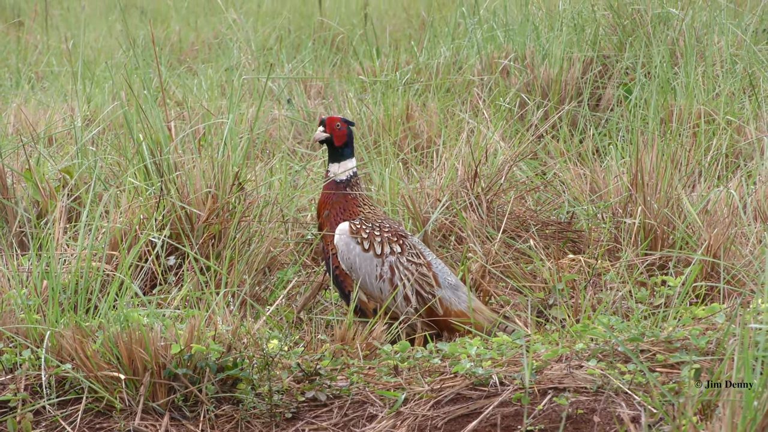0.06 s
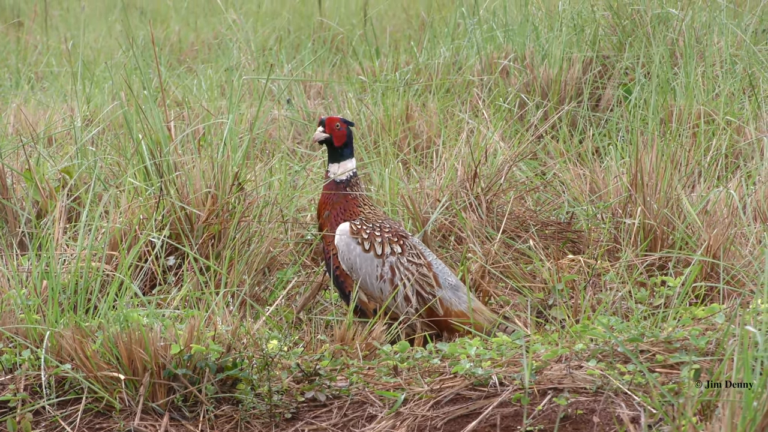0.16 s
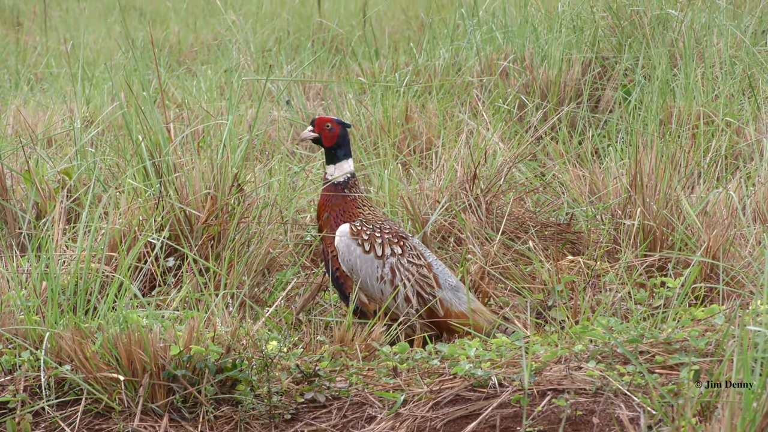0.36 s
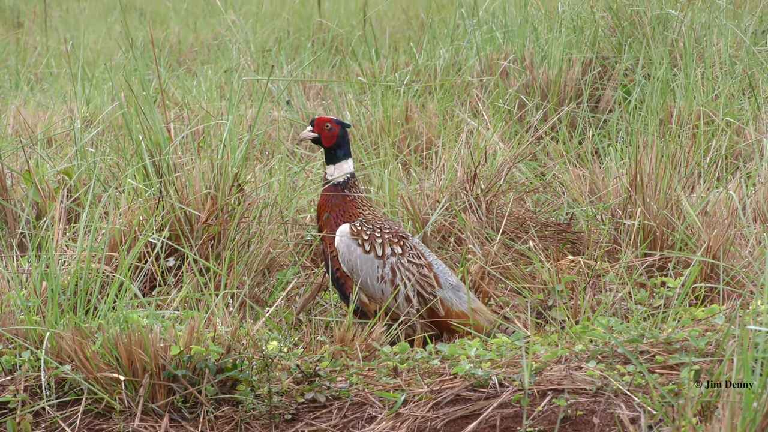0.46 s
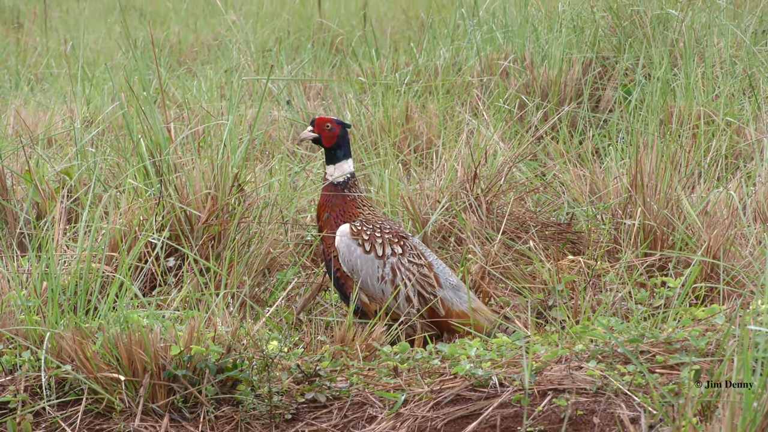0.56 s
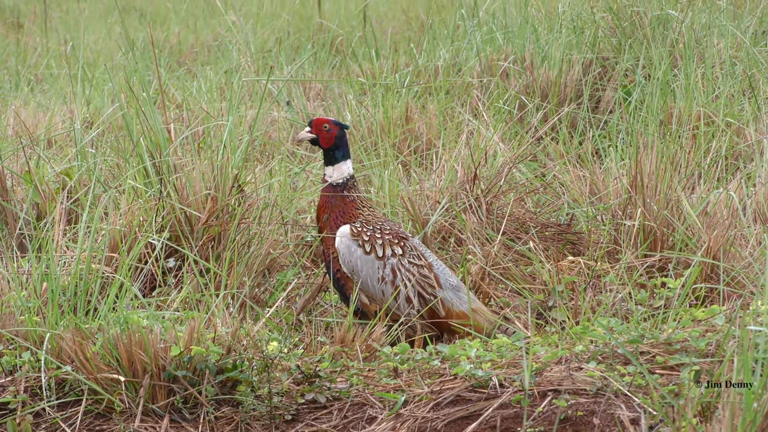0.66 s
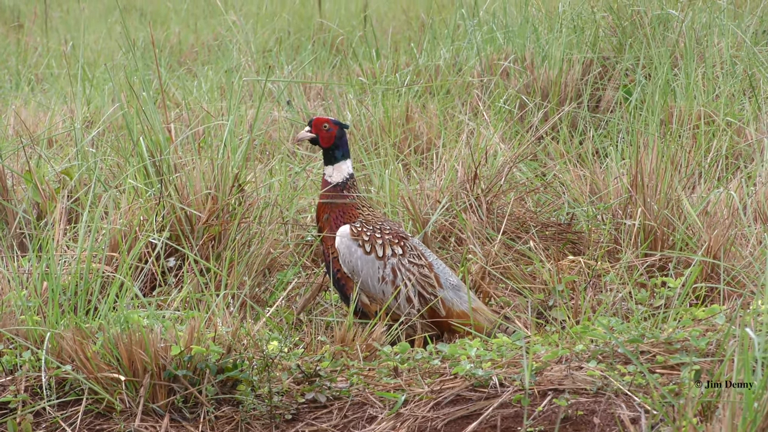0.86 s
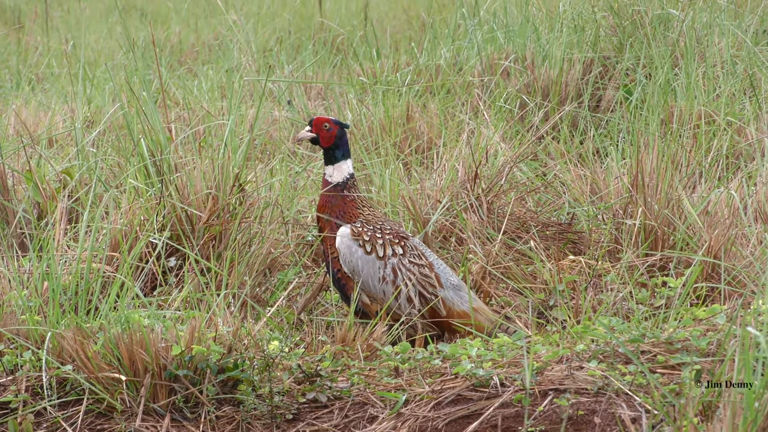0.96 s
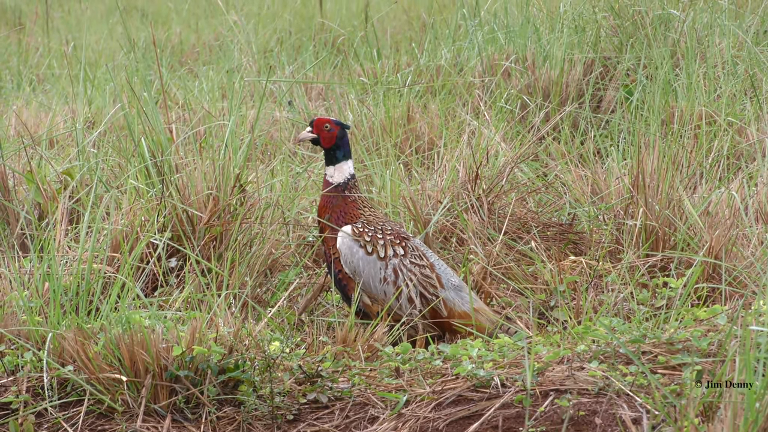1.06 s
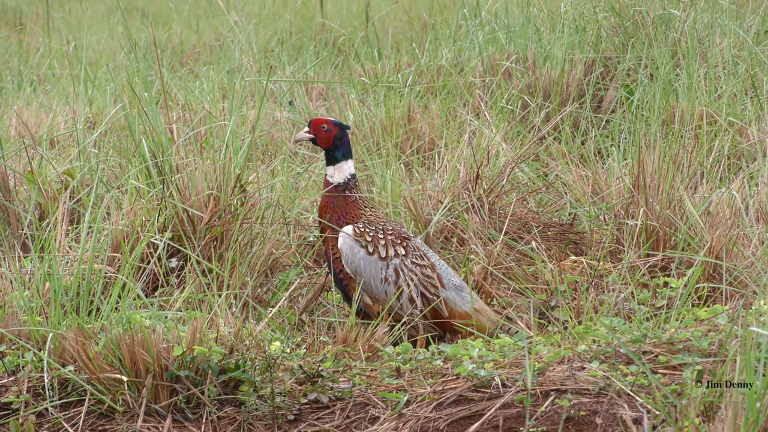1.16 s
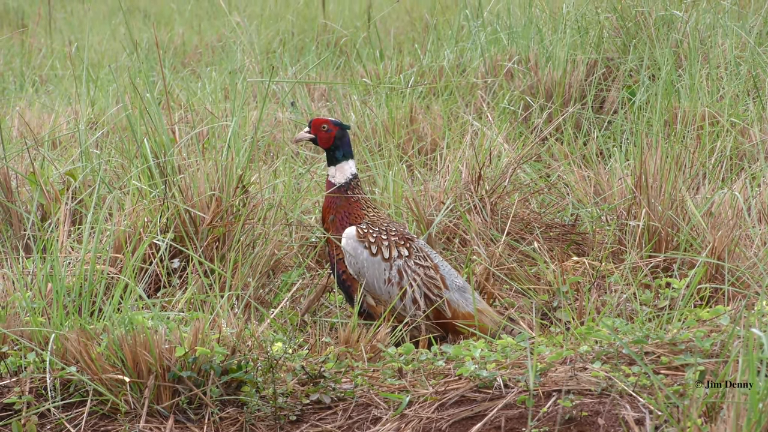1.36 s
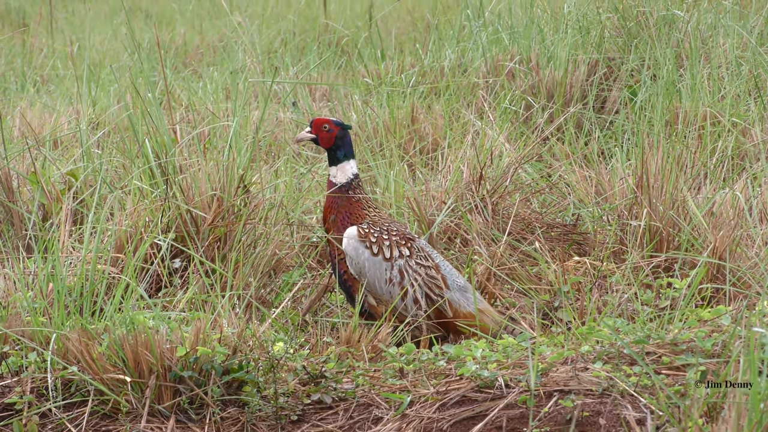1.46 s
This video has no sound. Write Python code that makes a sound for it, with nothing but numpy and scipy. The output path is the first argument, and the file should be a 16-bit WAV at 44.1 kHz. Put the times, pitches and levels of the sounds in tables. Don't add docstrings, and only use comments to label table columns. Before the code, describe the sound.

A pheasant close by lets out a long harsh crow, then a shorter one, followed by a quick run of low wing thuds. Open grassland, slight echo, faint hiss and distant songbirds, close stereo pickup.

```python
import sys
import numpy as np
from scipy import signal
from scipy.fft import rfft, irfft
from scipy.io import wavfile
from scipy.ndimage import uniform_filter1d

SR = 44100
rng = np.random.default_rng(int(sys.argv[2]) if len(sys.argv) > 2 else 0)


def natural_amplitude(level_db):
    exponent = np.asarray(level_db, float) / 20
    return 10 ** exponent


def bounce(signal):
    frames = np.transpose(np.atleast_2d(signal))
    limited = np.clip(frames, -1, 1)
    pcm = np.round(limited * 32767).astype(np.int16)
    wavfile.write(sys.argv[1], SR, pcm)


N = 66150


def evened(x):
    return x / np.sqrt(np.mean(x ** 2) + 1e-20)


def read(points, hz):
    f, value = np.transpose(points)
    return np.interp(np.log(hz + 1), np.log(f + 1), value)


def add(mix, start_s, sound):
    part = mix[..., max(round(start_s * SR), 0):][..., :sound.shape[-1]]
    part += sound[..., :part.shape[-1]]


def resonate(x, hz, width_hz):
    turn = np.exp(2j * np.pi * np.cumsum(hz * np.ones(len(x))) / SR)
    decay = np.exp(-np.pi * width_hz / SR)
    return 2 * (turn * signal.lfilter([1 - decay], [1, -decay], x / turn + 1e-18)).real


def drift(n, seconds):
    width = max(int(seconds * SR), 2)
    noise = rng.standard_normal(n)
    return evened(uniform_filter1d(uniform_filter1d(noise, width), width))


# frequency in Hz, level in dB per Hz.
AIR_SPECTRUM = [(12, -43), (20, -12.5), (123, -16), (192, -8.5), (277, -13.5), (498, -10.5), (1480, -15.5),
                (1960, -27.5), (15900, -40)]
# frequency in Hz, left-right likeness from -1 to 1.
COHERENCE = [(60, 0.95), (180, 0.96), (550, 0.89), (1650, -0.37), (4970, -0.0096), (15000, -0.53)]


def air():
    level_db, patch_db = -43.5, 1.73
    frames, hz = N // 256 + 5, np.fft.rfftfreq(1024, 1 / SR)
    a, b, c, d, patches = rng.standard_normal((frames, 513, 5)).T
    patches = evened(uniform_filter1d(uniform_filter1d(patches, 10, 0), 12, 1))
    same = np.clip(read(COHERENCE, hz), -1, 1)[:, None]
    left = a + 1j * b
    right = same * left + np.sqrt(1 - same ** 2) * (c + 1j * d)
    z = np.array([left, right]) * natural_amplitude(read(AIR_SPECTRUM, hz)[:, None] + patch_db * patches)
    noise = signal.istft(z, nperseg=1024, noverlap=768)[1][:, :N]
    return natural_amplitude(level_db) * evened(noise)


# start in seconds, length in seconds, first and last pitch in Hz, level in dB.
SONG_NOTES = [
    (.175, .028, 4900, 5000, -63),
    (1.115, .028, 3400, 3150, -54.5),
    (1.15, .028, 3350, 3200, -56),
    (1.2, .05, 3100, 3100, -61),
    (1.328, .045, 4450, 4060, -54),
    (1.368, .018, 4200, 4350, -58),
    (1.4, .045, 3950, 3430, -57),
    (1.475, .02, 3550, 3500, -60),
]


def songbirds():
    out = np.zeros(N)
    for start, length, from_hz, to_hz, db in SONG_NOTES:
        u = np.arange(0, 1, 1 / (length * SR))
        hz = to_hz + (from_hz - to_hz) * (1 - u) ** 1.79
        tone = np.sin(2 * np.pi * np.cumsum(hz) / SR)
        add(out, start, natural_amplitude(db + 3) * np.sin(np.pi * u) ** .6 * tone)
    out = out * natural_amplitude(1.6 * drift(N, .004))
    blur = rng.standard_normal((2, 4000)) * np.exp(-np.arange(4000) / SR / .015)
    wet = signal.fftconvolve(out[None], blur / np.linalg.norm(blur[0]), axes=1)[:, :N]
    return out * natural_amplitude([[-1.5], [1.5]]) + wet * .6


# delay in seconds, level in dB, smear in seconds, left-right balance in dB.
ECHOES = [
    (0.042, -18.5, 0.039, 8),
    (.128, -23.5, .02, -1.5),
    (0.291, -36.5, .03, 10),
]
# frequency in Hz, decay time over 60 dB in seconds.
FIELD_DECAY = [(500, 1), (1100, 0.64), (2000, 0.83), (4000, 0.75), (7000, 0.55), (12000, 0.23)]
# frequency in Hz, level in dB.
ECHO_COLOUR = [(1100, -1.5), (1950, -4.5), (3000, 2.5), (3850, -5.5), (4100, 7), (5000, 0), (11500, 7.5),
               (12500, -16)]


def meadow(x):
    tail_db = -13.5
    t = np.arange(SR) / SR
    hz, frame_s, z = signal.stft(rng.standard_normal((2, SR)), SR, nperseg=256)
    z = z * natural_amplitude(-60 * frame_s / read(FIELD_DECAY, hz)[:, None])
    tail = signal.istft(z, SR, nperseg=256)[1][:, :SR]
    tail = tail * np.clip(t / 0.019, 0, 1)
    room = natural_amplitude(tail_db) * tail / np.linalg.norm(tail[0])
    for delay, db, smear, pan_db in ECHOES:
        shape = np.exp(-np.maximum(t - delay, 0) / smear) * (t >= delay)
        noise = rng.standard_normal((3, SR))
        clump = shape * (noise[:1] + 0.23 * noise[1:])
        balance = natural_amplitude(db + pan_db * np.array([[.5], [-.5]]))
        room = room + balance * clump / np.linalg.norm(clump[0])
    far = irfft(rfft(x) * natural_amplitude(read(ECHO_COLOUR, np.fft.rfftfreq(N, 1 / SR))), N)
    return signal.fftconvolve(far[None], room, axes=1)[:, :N]


# frequency in Hz, left minus right in dB.
PAN = [(60, .3), (250, .8), (600, .5), (1100, -1), (2000, 1.2), (4000, .8), (8000, 0)]
# frequency in Hz, radians by which left leads.
LEAD = [(300, 0), (1200, -.15), (2500, -.4), (4100, -1.1), (5500, -1.2), (8000, -1.2)]


def ports(x):
    top_hz, top_db = 12100, -18
    grass_hz, grass_s, grass_share = 6300, .012, .75
    hz = np.fft.rfftfreq(N, 1 / SR)
    half = natural_amplitude(read(PAN, hz) / 2) * np.exp(.5j * read(LEAD, hz))
    stems = rng.standard_normal((2, 2000)) * np.exp(-np.arange(2000) / SR / grass_s)
    scattered = rfft(stems / np.linalg.norm(stems[0]), N)
    share = grass_share / (1 + (grass_hz / (hz + 1)) ** 8)
    paths = np.sqrt(1 - share) * np.array([half, 1 / half]) + np.sqrt(share) * scattered
    return irfft(rfft(x) * natural_amplitude(top_db * (hz > top_hz)) * paths, N)


# time in seconds, frequency in Hz, level in dB.
CLUCKS = [
    (0.216, 1700, -71),
    (0.724, 2750, -52),
    (0.73, 5500, -42.5),
]
# time in seconds, level in dB.
TICKS = [
    (.993, -48),
    (1.112, -50),
    (1.14, -51),
    (1.195, -50),
]


def clicks():
    out, t = np.zeros(N), np.arange(600) / SR
    for s, hz, db in CLUCKS:
        envelope = (t / 0.0032) * np.exp(-t / 0.0069)
        add(out, s - .003, natural_amplitude(db + 5.5) * envelope * np.sin(2 * np.pi * hz * t))
    for s, db in TICKS:
        noise = evened(resonate(rng.standard_normal(600), 2200, 3500))
        add(out, s, natural_amplitude(db) * noise * np.exp(-t / .002))
    return out


# time in seconds, thump level in dB, swish level in dB.
WINGBEATS = [
    (.94, -49, -43),
    (1.018, -36, -56),
    (1.094, -34.5, -48),
    (1.171, -30.5, -43),
    (1.248, -29, -45),
    (1.325, -30, -40),
    (1.394, -29.5, -46),
    (1.467, -30, -73),
]


def wings():
    thump_hz, thump_s, swish_hz, swish_s = 95, .0041, 1500, .006
    up_lead_s, up_db = .024, -9
    whirr_hz, whirr_db, whirr_start_s, whirr_rise_s = 350, -46.5, 0.83, 0.14
    out, t = np.zeros(N), np.arange(-2000, 2000) / SR
    push = np.cos(2 * np.pi * thump_hz * t) * np.exp(-.5 * (t / thump_s) ** 2)
    for s, db, swish_db in WINGBEATS:
        hiss = evened(resonate(rng.standard_normal(len(t)), swish_hz, 3000))
        flap = natural_amplitude(db) * push + natural_amplitude(swish_db) * hiss * np.exp(-abs(t) / swish_s)
        add(out, s + t[0], flap)
        add(out, s + t[0] - up_lead_s, natural_amplitude(up_db) * flap[::-1])
    whirr = evened(resonate(rng.standard_normal(N), whirr_hz, 900)) * natural_amplitude(1.2 * drift(N, .012))
    rise = np.clip((np.arange(N) / SR - whirr_start_s) / whirr_rise_s, 0, 1)
    return out + natural_amplitude(whirr_db) * whirr * rise


# frequency in Hz, width in Hz, level in dB.
THROAT = [(782, 510, -17), (1267, 230, -10), (1653, 134, -15), (1915, 152, -8), (3007, 810, -14.5),
          (3530, 210, -10.5), (3830, 131, -.5), (4025, 185, -3), (4720, 600, -10), (5159, 440, -10.5),
          (5890, 640, -19), (8100, 4170, -20.5), (9680, 6600, -23)]


def throat(drive, bright_db):
    beak_hz = 4400
    plain, coloured = 0, 0
    for k, (hz, width, db) in enumerate(THROAT):
        ring = resonate(resonate(drive, hz, width), hz, width) / np.sqrt(width)
        ring = (-1) ** k * natural_amplitude(db) * ring
        plain = plain + ring
        coloured = coloured + ring * natural_amplitude(bright_db * (hz > beak_hz))
    return coloured / np.std(plain)


def rattle(hz, bright_db):
    divide, jitter, breath = 5, .03, .62
    n = len(hz)
    turns = np.cumsum(hz / divide * (1 + jitter * drift(n, 0.00589))) / SR
    pulses = sum(np.cos(2 * np.pi * k * turns) for k in range(3, 56))
    puffs = (.4 + np.exp(-(turns % 1) / .4)) * rng.standard_normal(n)
    return throat((1 - breath) * evened(pulses) + breath * evened(puffs), bright_db)


def whistle(hz, rough):
    width_hz, wobble_db = 70, 4
    n = len(hz)
    wavering_hz = hz * (1 + 0.058 * rough * drift(n, 0.0012))
    clean = np.sqrt(2) * np.sin(2 * np.pi * np.cumsum(wavering_hz) / SR)
    clean = clean * natural_amplitude(wobble_db * rough * drift(n, 0.0032))
    fuzz = evened(resonate(resonate(rng.standard_normal(n), hz, 3 * width_hz), hz, width_hz))
    return np.sqrt(1 - rough ** 2) * clean + rough * fuzz


def syllable(rows):
    s, hz, tone_db, rasp_db, bright_db = np.transpose(rows)
    t = np.arange(round(.35 * SR)) / SR + s[0]
    hz, bright_db = np.interp(t, s, hz), np.interp(t, s, bright_db)
    rough = .22 * np.clip(natural_amplitude(np.interp(t, s, rasp_db - tone_db) + 3), 0, 1.3)
    ends = np.clip(np.minimum(t - s[0], s[-1] - t) / 0.0016, 0, 1)
    tone = natural_amplitude(np.interp(t, s, tone_db)) * whistle(hz, rough)
    rasp = natural_amplitude(np.interp(t, s, rasp_db)) * rattle(hz, bright_db)
    return s[0], ends * (tone + rasp)


# time in seconds, whistle in Hz, whistle level in dB, rasp level in dB,
# beak brightness in dB.
CROW_SYLLABLES = [
    [(0.212, 1043, -66, -53, -5), (0.22, 1034, -34.5, -38, 2), (0.23, 1027, -22, -22.5, -4),
     (0.28, 1071, -21, -19.5, 0.5), (0.328, 1074, -18, -20, 2.5), (0.43, 1043, -22, -21.5, -0.5),
     (0.45, 1050, -21, -24, -1), (0.458, 1133, -21, -29.5, 3.5), (0.48, 1100, -46, -46, 16)],
    [(0.722, 1115, -58, -54, 0), (0.734, 1020, -32.5, -25.5, -7), (0.748, 1016, -24, -22, -3),
     (0.772, 1041, -23.5, -22, -0.5), (0.818, 1054, -19, -20, -1.5), (0.84, 1049, -27, -23.5, 1),
     (0.86, 1108, -25.5, -29, 2.5), (0.882, 1124, -23.5, -37, 9), (0.9, 1105, -39, -33.5, 4)],
]


def crow():
    out = np.zeros(N)
    for rows in CROW_SYLLABLES:
        add(out, *syllable(rows))
    return out


def scene():
    call = crow()
    return ports(call + wings() + clicks()) + meadow(call) + songbirds() + air()


def band_limit(x):
    return signal.sosfilt(signal.butter(12, 15780, fs=SR, output="sos"), x)


def record(dry):
    edge_hz = 15800
    lowpass = signal.firwin(511, edge_hz, window=("kaiser", 9), fs=SR)
    mix = signal.oaconvolve(dry, lowpass[None], "same")
    return band_limit(mix)


dry = scene()
out = record(dry)
bounce(out)
```